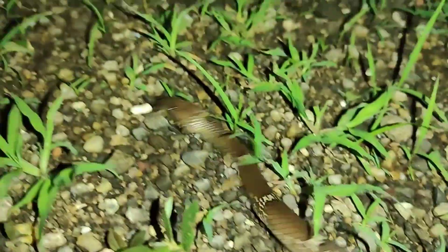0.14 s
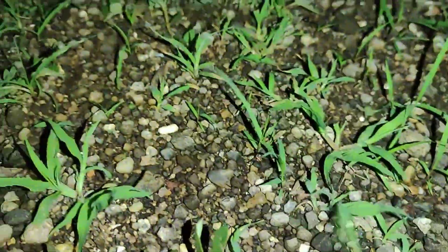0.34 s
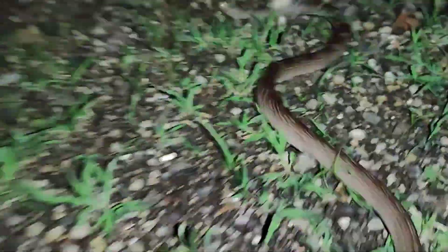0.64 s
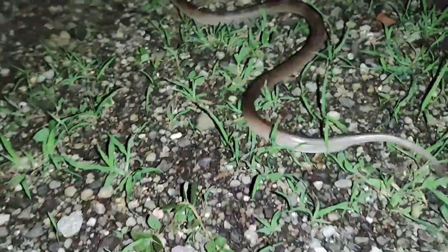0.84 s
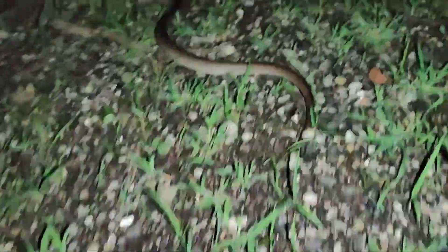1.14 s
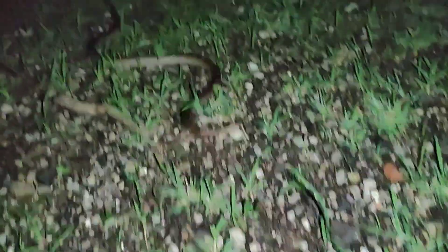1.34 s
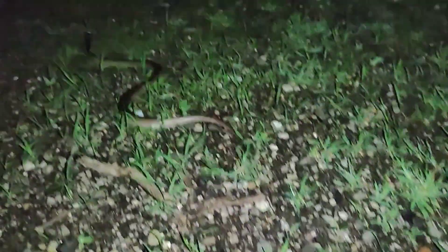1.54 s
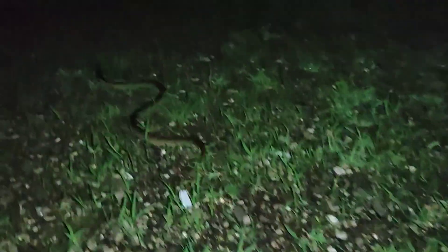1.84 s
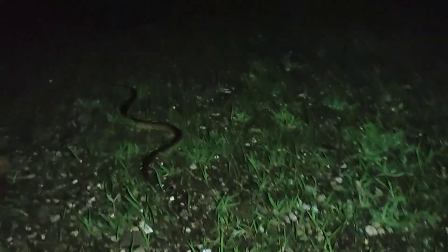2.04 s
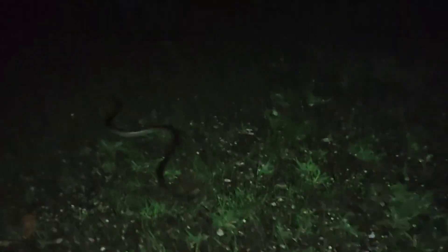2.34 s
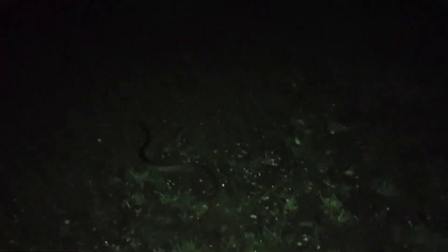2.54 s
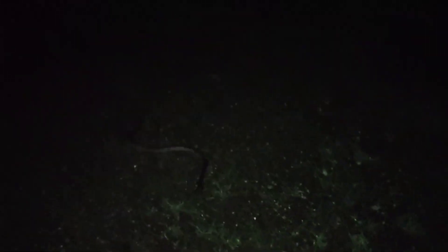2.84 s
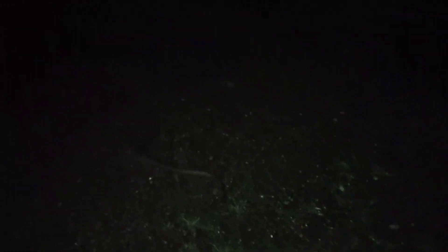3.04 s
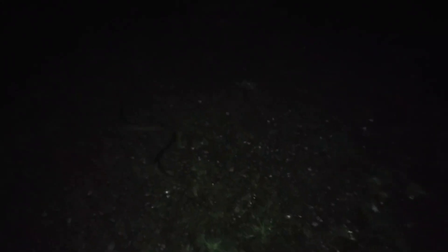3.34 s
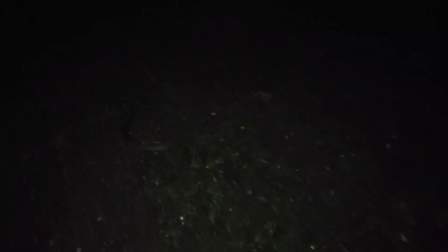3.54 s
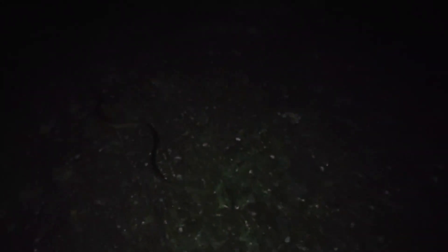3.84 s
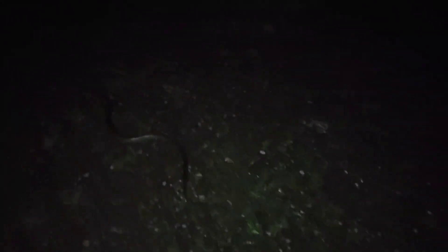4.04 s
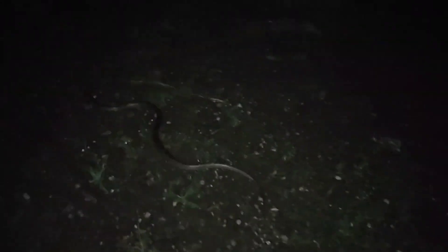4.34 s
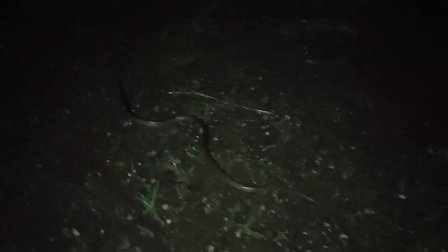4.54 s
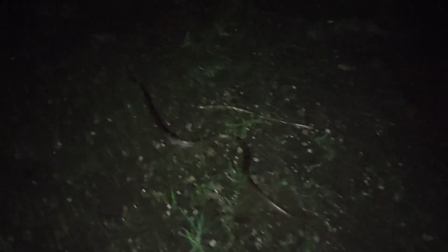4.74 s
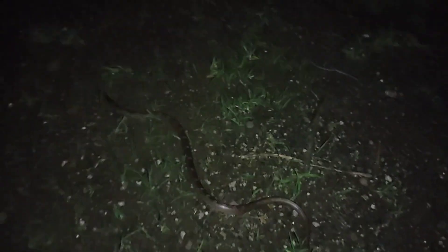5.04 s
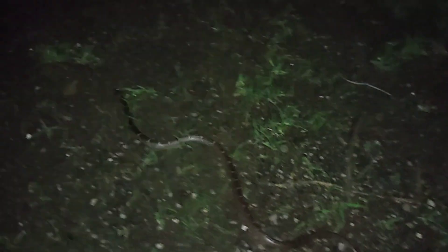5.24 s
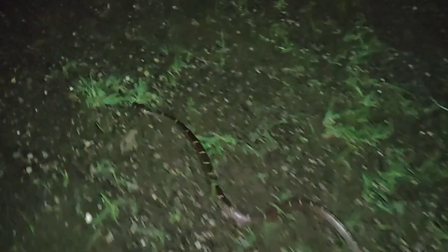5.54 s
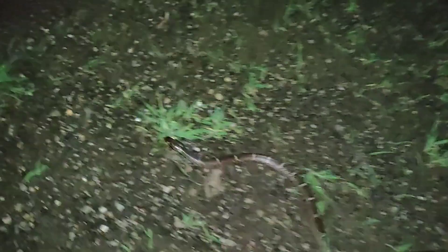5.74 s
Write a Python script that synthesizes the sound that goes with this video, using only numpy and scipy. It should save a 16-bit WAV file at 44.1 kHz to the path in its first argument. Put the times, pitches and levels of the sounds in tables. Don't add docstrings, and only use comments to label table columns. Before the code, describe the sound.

Night crickets trill in overlapping bright phrases over a shimmering far chorus while a hand-held recorder rumbles, gravel clicks and dry stems snap.

```python
import sys
import numpy as np
from scipy import signal
from scipy.fft import rfft, irfft, next_fast_len
from scipy.io import wavfile
from scipy.ndimage import map_coordinates

SR = 44100
rng = np.random.default_rng(int(sys.argv[2]) if len(sys.argv) > 2 else 0)


def invert_db(level):
    return 10 ** (np.asarray(level, dtype=float) / 20)


def master(y):
    cut = np.clip(np.atleast_2d(y).T, -1, 1)
    pcm = np.round(cut * 32767)
    wavfile.write(sys.argv[1], SR, pcm.astype(np.int16))


N = 259749

# frequency in Hz, density in dB per Hz.
NIGHT_SPECTRUM = [(30, -14), (60, -8), (140, -3), (250, -13.5), (450, -17.5), (700, -19), (1100, -18.5),
                  (2000, -12.5), (2800, -12.5), (3400, -14), (5800, -23.5), (7500, -19.5), (11000, -20),
                  (15500, -28.5)]
NIGHT_DB, NIGHT_PATCHY_DB = -51.5, 3

# centre in Hz, spread in Hz, strokes per second, stroke length in seconds,
# pitch fall in Hz per second, left-right likeness from 0 to 1.
LOW_CHORUS = (4098, 245, 300, 0.00534, 19000, 0.192)
MID_CHORUS = (5080, 106, 120, 0.0171, 57400, 0.302)
HIGH_CHORUS = (6400, 90, 60, .014, 55000, .4)
# time in seconds, low band in dB, high band in dB, high band left over right in dB.
CHORUS_LEVELS = [(0.0, -48.5, -62, 0), (0.5, -47.5, -59, -10.5), (1.0, -49, -56.5, -4.5),
                 (1.5, -48, -52.5, -5), (2.0, -45.5, -57.5, -2), (2.5, -45.5, -56, -7.5),
                 (3.0, -44.5, -53.5, -12), (3.5, -46, -53.5, -9.5), (4.0, -44.5, -52.5, -10.5),
                 (4.5, -43.5, -56.5, -5), (5.0, -43, -56.5, -5), (5.5, -45.5, -56.5, -4),
                 (5.89, -42.5, -53.5, -5)]
MID_CHORUS_DB = -51.5

# last stroke in seconds, tempo stretch as a ratio, number of strokes,
# peak in dB, left over right in dB.
PHRASES = [(0.227, .99, 19, -28, -1.2), (0.376, 1.02, 15, -37.5, -2), (0.868, 1.005, 17, -28.5, -1.1),
           (0.989, 1.065, 15, -35.5, -3), (1.465, 1.02, 16, -28, -0.5), (1.458, 1.02, 12, -31.5, 0),
           (1.953, 1.02, 13, -35.5, -3), (2.116, .975, 18, -29, -1.8), (2.596, .93, 16, -30.5, -4.5),
           (2.601, .96, 13, -27.5, -2.5), (3.112, 1.02, 15, -33.5, -5), (3.377, .975, 17, -27, -2.5),
           (3.685, 1.005, 16, -32.5, -4), (4.374, 1.08, 15, -32, -2.5), (4.316, 1.02, 13, -29.5, -5.5),
           (4.885, 1.035, 15, -32.5, 0), (5.002, 1.08, 15, -29, -2), (5.091, 1.02, 14, -38.5, -8.5),
           (5.403, 1.095, 13, -32.5, -1.54), (5.649, 1.005, 17, -27.5, -1.5), (6.034, 1.125, 15, -28, -2.5)]
# time in seconds, left phase lead in radians.
SINGER_LEAD = [(0.0, 1.62), (0.5, 0.64), (1.5, 1.14), (2.0, 2.5), (3.0, 0.6659), (4.5, 1.99), (5.0, 0.28),
               (5.5, -0.21), (5.75, -2)]
QUICK_GAP_S, SLOW_GAP_S = .017, .0325
SLOWING_AT, SLOWING_OVER = 8.0, 1.6
FIRST_DB, SWELL_STROKES = -11.5, 3.5
UNEVEN_DB, UNEVEN_S = 1.2, .0005
OVERTONE_DB = -32

# peak in seconds, time to fall 10 dB in seconds, level in dB,
# left over right in dB.
GUSTS = [
    (.7, 0.2, -57, -3),
    (1.5, 0.63, -52.5, 1.5),
    (2.05, 0.45, -59, -1),
    (2.55, 0.21, -54, -4),
    (3.72, .07, -46, -13.5),
    (4.56, 0.1329, -46, -19.5),
    (4.68, 0.0083, -45, -26),
    (5.15, .1, -50, -13),
    (5.3, 0.1472, -47.5, -15.5),
    (5.76, 0.0167, -46, -17.5),
]
BREEZE_DB = -69
# start in seconds, length in seconds, level in dB.
GRIPS = [(0, 0.1586, -46.5), (.171, 0.2735, -43), (.353, 0.107, -62), (.579, 0.143, -66),
         (.763, 0.0285, -58.5), (.86, 0.0727, -35), (1.037, 0.0524, -44.5), (1.803, 0.197, -61.5),
         (3.416, 0.0452, -48.5), (3.729, 0.036, -54), (3.871, .024, -50.5), (4.026, 0.0175, -57),
         (4.309, 0.0695, -58), (4.635, 0.0336, -52), (4.852, 0.127, -53), (5.065, 0.064, -51),
         (5.7, 0.0186, -47), (5.745, 0.034, -58)]
# frequency in Hz, density in dB per Hz.
RUMBLE_SPECTRUM = [(70, -31), (150, 4), (300, 1), (700, -1), (1000, -17.5), (1600, -71)]
# start in seconds, length in seconds, level in dB.
BRUSHES = [(0, 0.19, -71.5), (.171, 0.277, -62), (.353, 0.139, -59.5), (.496, 0.074, -59),
           (.579, 0.1194, -58.5), (.7, 0.079, -62), (.78, 0.0265, -60), (.86, 0.074, -62.5),
           (1.037, 0.0536, -67), (1.744, 0.054, -66), (1.803, 0.15, -64.5), (2.197, .051, -67),
           (2.271, 0.091, -68), (4.097, 0.017, -71.5), (4.309, 0.073, -68.5), (5.065, 0.072, -67.5),
           (5.7, 0.034, -59.5), (5.745, 0.0423, -57), (5.803, 0.0784, -64)]
# frequency in Hz, density in dB per Hz.
GRASS_SPECTRUM = [(2500, 0.5), (4500, -7.5), (7000, -1), (9000, -2.5), (12000, -5.5), (15500, -8),
                  (18000, -52.5)]
# start in seconds, length in seconds, level in dB.
STEPS = [(.171, 0.26, -64), (.45, 0.183, -70), (.763, 0.0275, -54), (.86, 0.062, -64.5),
         (1.803, 0.1535, -49), (2.082, 0.0825, -57.5), (2.197, 0.0434, -54.5), (2.271, 0.0665, -60.5),
         (2.362, 0.098, -58), (2.879, 0.033, -67), (3.118, 0.027, -68), (3.206, 0.202, -65),
         (3.416, 0.0495, -54.5), (3.525, .1, -55.5), (3.729, 0.025, -63.5), (3.871, 0.0212, -59),
         (4.309, 0.0816, -56.5), (4.418, 0.0217, -61.5), (4.635, 0.038, -59.5), (4.852, 0.094, -62),
         (5.065, 0.0695, -52.5), (5.213, 0.0224, -62), (5.7, 0.0276, -59.5), (5.745, 0.042, -53),
         (5.803, 0.0836, -53)]
# frequency in Hz, density in dB per Hz.
GRAVEL_SPECTRUM = [(300, -51), (550, -4), (1400, 1.5), (2400, 2), (3400, -8), (5000, -6), (9000, -27)]
PORT_LAG = 10

# start in seconds, peak in dB, ring in Hz.
BUMPS = [(0.201, -37, 457), (0.247, -33, 222), (0.861, -29, 421), (0.892, -34, 183), (1.08, -30, 254.4),
         (2.314, -41.5, 376), (3.746, -48, 439), (4.309, -43, 164), (4.922, -39, 302), (5.699, -40, 154),
         (5.769, -34, 142.2)]
# start in seconds, peak in dB, ring in Hz, left over right in dB.
STONES = [(0.369, -45, 732, -12), (0.778, -36, 1483, 6.5), (0.863, -41.5, 610, -10), (0.891, -42, 733, 10),
          (0.917, -37.5, 650, -5), (1.085, -40, 839, 2.5), (1.866, -32, 2500, -2), (1.88, -25, 1666, -10),
          (1.973, -22, 1995, -14), (2.134, -33, 1963, -9.5), (2.198, -38.5, 1340, 2.5),
          (2.217, -35.5, 865, 1), (2.276, -35, 1177, -2.5), (2.308, -39.5, 827, -1.5),
          (2.443, -39, 1300, -2.5), (2.903, -43, 1018, -0.5), (2.93, -39, 1310, -2),
          (3.132, -44.5, 666, -1.5), (3.44, -40, 659, -1), (3.505, -35, 1460, -2.5), (3.744, -39.5, 805, 0),
          (3.887, -43, 663, -2.0), (4.316, -34, 849, 2), (5.07, -40.5, 726, 1), (5.506, -37, 1950, -7),
          (5.715, -38, 1074, 3.5), (5.749, -46, 1170, -4), (5.773, -18, 1292, -3)]
# start in seconds, peak in dB, left over right in dB.
SNAPS = [(0.4234, -31, -11), (0.5217, -33, -11), (0.5352, -29.5, -13.5), (0.624, -26.5, -12),
         (0.6516, -24.5, -14.5), (0.6575, -31, -6), (0.78, -30, 1.5), (0.8044, -28.5, 2), (1.803, -33, 2.5),
         (2.1558, -38, -7.5), (2.1635, -32.5, -5), (1.757, -37, -3), (2.19, -33, 1), (4.122, -35.5, -2),
         (2.1976, -19, -2), (2.2202, -30, -5.5)]

# first buzz in seconds, number of buzzes, period in seconds.
BUZZES = [
    (.875, 19, .097),
    (3.15, 6, .098),
    (3.92, 21, .0965),
]
# time in seconds, level in dB, resonance in Hz.
KATYDID_TONE = [(.88, -52.5, 9860), (1.2, -53, 9640), (1.5, -49.5, 9720), (2, -57, 9330),
                (2.6, -56.5, 9550), (3.15, -56, 9700), (3.64, -54.5, 9540), (3.92, -49, 9600),
                (4.4, -51, 9760), (4.9, -54, 9560), (5.3, -55.5, 9320), (5.85, -51.5, 9600)]
# start in seconds, end in seconds, slips in Hz, level in dB.
CREAK = (1.13, 1.222, 240, -48)
# start in seconds, peak in dB, swing in Hz, left over right in dB.
THUDS = [
    (3.71, -43, 50, -14),
    (4.698, -33, 80, -25),
    (5.172, -42, 60, -14),
    (5.742, -34, 75, -18),
]


def in_time(rows, t=None):
    s, *columns = np.transpose(rows)
    if t is None:
        t = np.arange(N) / SR
    return [np.interp(t, s, column) for column in columns]


def rms_one(x):
    return x / np.sqrt(np.mean(x ** 2) + 1e-20)


def colour(x, points):
    size = next_fast_len(N)
    hz, level_db = np.transpose(points)
    bin_hz = np.arange(size // 2 + 1) * SR / size + 1
    gain = invert_db(np.interp(np.log(bin_hz), np.log(hz), level_db))
    return rms_one(irfft(rfft(x, size) * gain, size)[:, :N])


def pair(draw, alike):
    alike = np.clip(alike, -1, 1)
    shared = np.sqrt(1 + alike) * draw()
    return shared + np.sqrt(1 - alike) * draw() * [[1], [-1]]


def hiss():
    return rng.standard_normal(N)


def grains(per_s, spread_db):
    sizes = invert_db(spread_db * np.minimum(rng.exponential(1, N), 4)) * rng.choice([-1, 1], N)
    return rms_one(sizes * (rng.random(N) < per_s / SR))


def drift(per_s):
    knots = rng.standard_normal(int(per_s * N / SR) + 2)
    return rms_one(map_coordinates(knots, [np.arange(N) * per_s / SR], order=3))


def sides(pan_db):
    return invert_db(np.outer([.5, -.5], pan_db))


def add(out, at_s, sounds):
    where = np.round(at_s * SR).astype(int)[:, None] + np.arange(sounds.shape[-1])
    inside = (where >= 0) & (where < N)
    for ear in range(2):
        out[ear] += np.bincount(where[inside], sounds[ear][inside], N)
    return out


def from_ground(x):
    return np.array([np.roll(x[0], PORT_LAG), x[1]])


def scattered(x, decay_s):
    echoes = rng.standard_normal((2, 4000)) * np.exp(-np.arange(4000) / (decay_s * SR))
    return signal.fftconvolve(x, echoes / np.linalg.norm(echoes[0]), axes=1)[:, :N]


def night_air():
    bass = signal.butter(1, 700, fs=SR, output="sos")
    air = rng.standard_normal((2, N))
    air[0] += signal.sosfilt(bass, air[1] - air[0])
    rest, out = colour(air, NIGHT_SPECTRUM), 0
    for top_hz in 250 * 2 ** np.arange(5):
        octave = signal.sosfiltfilt(signal.butter(2, top_hz, fs=SR, output="sos"), rest)
        out = out + octave * invert_db(NIGHT_PATCHY_DB * drift(4))
        rest = rest - octave
    return invert_db(NIGHT_DB) * (out + rest) * sides(-2.72)


def wing(hz, length_s, fall_hz, lead, third_db=-80):
    t = np.arange(1500) / SR - .01
    u = t / length_s[:, None]
    shape = np.exp(-np.where(u < 0, (u / 0.344) ** 2, (u / 0.5675) ** 2))
    turn = 2 * np.pi * (hz[:, None] * t - fall_hz * t ** 2 / 2 + rng.random((len(hz), 1)))
    turn = turn + np.array([lead, 0 * lead])[:, :, None]
    return shape * (np.sin(turn) + invert_db(third_db) * np.sin(3 * turn))


def chorus(hz, spread_hz, per_s, length_s, fall_hz, alike):
    chance = rng.random((1800, 4))
    chance = chance[np.cumsum(2 * chance[:, 0] / per_s) < N / SR]
    s = np.cumsum(2 * chance[:, 0] / per_s)
    pitch_hz = hz + spread_hz * np.arctanh(1.9 * chance[:, 1] - .95)
    lead = 2 * np.pi * (1 - alike) * (chance[:, 2] - .5)
    strokes = wing(pitch_hz, length_s + 0 * s, fall_hz, lead)
    return rms_one(add(np.zeros((2, N)), s, invert_db(2.13 * chance[:, 3])[:, None] * strokes))


def triller(hz, pulse_hz, wander):
    t = np.arange(N) / SR
    phase = wander * np.cumsum(rng.standard_normal((2, N)), axis=1)
    pulses = (.5 + .5 * np.cos(2 * np.pi * pulse_hz * t + phase[0])) ** 3
    lead = np.array([[.9], [0]])
    return rms_one(pulses * np.sin(2 * np.pi * (hz - pulse_hz / 2) * t + phase[1] + lead))


def far_crickets():
    low_db, high_db, high_pan_db = in_time(CHORUS_LEVELS)
    song = (invert_db(low_db - 3.0) * sides(-4) * chorus(*LOW_CHORUS)
            + invert_db(MID_CHORUS_DB) * sides(-3.0) * chorus(*MID_CHORUS)
            + invert_db(high_db - 3.0) * sides(high_pan_db) * chorus(*HIGH_CHORUS))
    trill = invert_db(low_db - 6.5) * sides(-3) * triller(4125, 83.5, wander=.024)
    return song + invert_db(-3) * scattered(song, decay_s=.02) + trill


def phrase(last_s, stretch, strokes, level_db, pan_db):
    k = np.arange(int(strokes))
    slowing = 1 / (1 + np.exp((SLOWING_AT - k) / SLOWING_OVER))
    gap = stretch * (QUICK_GAP_S + (SLOW_GAP_S - QUICK_GAP_S) * slowing)
    s = np.cumsum(gap) - gap
    swell_db = level_db + FIRST_DB * np.exp(-k / SWELL_STROKES)
    return np.transpose([last_s + s - s[-1], gap, swell_db, pan_db + 0 * s])


def near_crickets():
    s, gap, level_db, pan_db = np.concatenate([phrase(*row) for row in PHRASES]).T
    lead, = in_time(SINGER_LEAD, s)
    chance = rng.standard_normal((len(s), 5))
    pitch_hz = 5130 + 5000 * (gap - .025) + 30 * chance[:, 0]
    strokes = wing(pitch_hz, .005 + .3 * gap, 37000, lead + 0.423 * chance[:, 1], third_db=OVERTONE_DB)
    gain = invert_db(level_db + .6 + UNEVEN_DB * chance[:, 3]) * sides(pan_db + 2.0 * chance[:, 2])
    start_s = s + UNEVEN_S * chance[:, 4] - .01
    song = add(np.zeros((2, N)), start_s, gain[:, :, None] * strokes)
    return song + invert_db(-8.5) * scattered(song, decay_s=0.0132)


def buffeting():
    t = np.arange(N) / SR
    puffs = sum((invert_db(level_db - 10 * np.abs(t - s) / fall_s) * sides(pan_db)) ** 2
                for s, fall_s, level_db, pan_db in GUSTS)
    lows = signal.butter(2, [38, 120], "band", fs=SR, output="sos")
    buffet = rms_one(signal.sosfilt(lows, pair(lambda: grains(600, 1.5), 0.4)))
    return invert_db(-3.5) * np.sqrt(puffs + invert_db(BREEZE_DB) ** 2) * buffet


def scuffs(rows):
    t = np.arange(N) / SR
    power = 0
    for s, length_s, level_db in rows:
        opening = np.clip((t - s) / (0.204 * length_s) + 0.414, 0, 1)
        trail = np.exp(-np.clip(t - s - 0.9004 * length_s, 0, 1) / 0.02144)
        power = power + (invert_db(level_db) * opening * trail) ** 2
    return np.sqrt(power)


def case_rumble():
    rumble = colour(pair(lambda: grains(1200, 2.61), 0.646), RUMBLE_SPECTRUM) * sides(-2.23)
    return invert_db(-0.5) * scuffs(GRIPS) * rumble


def grass_rustle():
    rustle = pair(lambda: grains(3000, 6.3) + 1.41 * hiss(), 0.114)
    return invert_db(15.5) * scuffs(BRUSHES) * colour(rustle, GRASS_SPECTRUM) * sides(-2.5)


def gravel_crunch():
    crunch = pair(lambda: grains(900, 5.45) + 0.466 * hiss(), 0.739)
    return invert_db(13.5) * scuffs(STEPS) * from_ground(colour(crunch, GRAVEL_SPECTRUM)) * sides(-4.5)


def knocks(s, level_db, hz, pan_db, cycles):
    t = np.arange(1300) / SR
    fade = np.exp(-t * hz[:, None] / cycles)
    crack = 1.225 * rng.standard_normal((2, len(s), 1300)) * fade
    ring = np.sin(2 * np.pi * hz[:, None] * t) + crack
    return add(np.zeros((2, N)), s, (invert_db(level_db) * sides(pan_db))[:, :, None] * ring * fade)


def case_bumps():
    duller = signal.butter(2, 900, fs=SR, output="sos")
    s, level_db, hz = np.transpose(BUMPS)
    return signal.sosfilt(duller, knocks(s, level_db + 4.5, hz, 0 * s - 2.5, cycles=1.56))


def stone_clicks():
    dull = signal.butter(2, [480, 3600], "band", fs=SR, output="sos")
    return from_ground(signal.sosfilt(dull, invert_db(5) * knocks(*np.transpose(STONES), cycles=3.04)))


def stem_snaps():
    bright = signal.butter(2, [5500, 14500], "band", fs=SR, output="sos")
    s, level_db, pan_db = np.transpose(SNAPS)
    splinter = rng.standard_normal((2, len(s), 600)) * np.exp(-np.arange(600) / (.0012 * SR))
    gain = invert_db(level_db + 2.5) * sides(pan_db)
    return signal.sosfilt(bright, add(np.zeros((2, N)), s, gain[:, :, None] * splinter))


def resonance(x, hz, width_hz):
    r = np.exp(-np.pi * width_hz / SR)
    poles = [1, -2 * r * np.cos(2 * np.pi * hz / SR), r * r]
    return signal.lfilter([(1 - r * r) / 2, 0, (r * r - 1) / 2], poles, x)


def katydid():
    s = np.concatenate([first + period * np.arange(count) for first, count, period in BUZZES])
    level_db, pitch_hz = in_time(KATYDID_TONE, s)
    t = np.arange(3600) / SR
    teeth = (.5 + .5 * np.cos(2 * np.pi * 240 * t + 6 * rng.random((len(s), 1)))) ** 1.5
    swell = np.clip(2.9 * np.sin(np.pi * np.clip(t / 0.0749, 0, 1)), 0, 1)
    envelope = teeth * swell * invert_db(level_db + 18.5)[:, None]
    scrape = rng.standard_normal((len(s), 2, 3600)) * envelope[:, None]
    buzz = [resonance(resonance(x, hz, 750), hz, 1200) for x, hz in zip(scrape, pitch_hz)]
    return add(np.zeros((2, N)), s - .038, np.swapaxes(buzz, 0, 1))


def creak():
    start, end, hz, level_db = CREAK
    t = np.arange(N) / SR
    turn = 2 * np.pi * hz * t + 0.0118 * np.cumsum(rng.standard_normal(N))
    slips = np.sin(turn) + .8 * np.sin(2 * turn) + .14 * np.sin(3 * turn) + .1 * np.sin(5 * turn)
    envelope = np.clip(np.minimum((t - start) / .04, (end - t) / .015), 0, 1)
    return invert_db(level_db) * envelope * slips * invert_db(np.array([[-25], [3]]))


def thuds():
    dull = signal.butter(2, 130, fs=SR, output="sos")
    return signal.sosfilt(dull, knocks(*np.transpose(THUDS), cycles=1.2))


def scene():
    insects = far_crickets() + near_crickets() + katydid()
    walker = buffeting() + case_rumble() + grass_rustle() + gravel_crunch()
    contacts = case_bumps() + stone_clicks() + stem_snaps() + creak() + thuds()
    return night_air() + insects + walker + contacts


def top_cut(x):
    return signal.sosfilt(signal.butter(12, 16820, fs=SR, output="sos"), x)


def record(dry):
    mix = signal.sosfilt(signal.ellip(10, .5, 44, 15700, fs=SR, output="sos"), dry)
    return top_cut(mix)


dry = scene()
out = record(dry)
master(out)
```